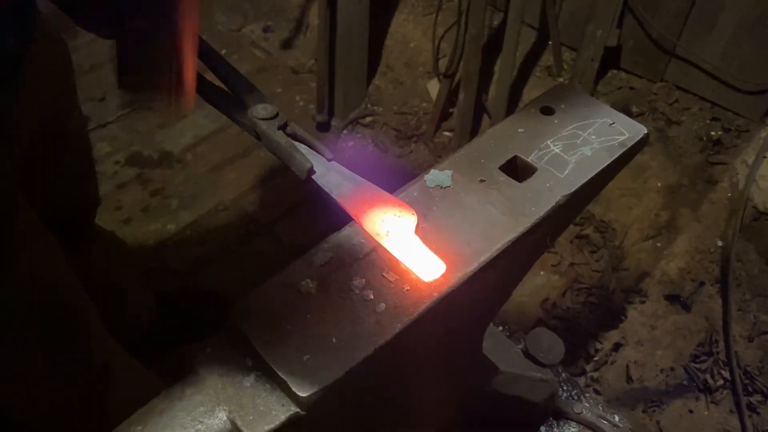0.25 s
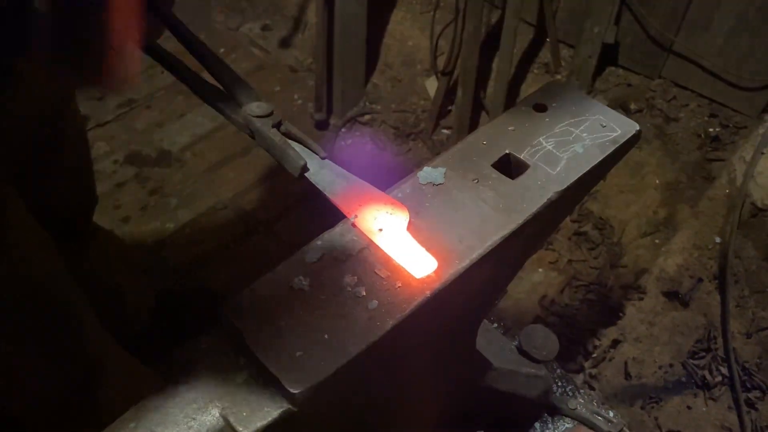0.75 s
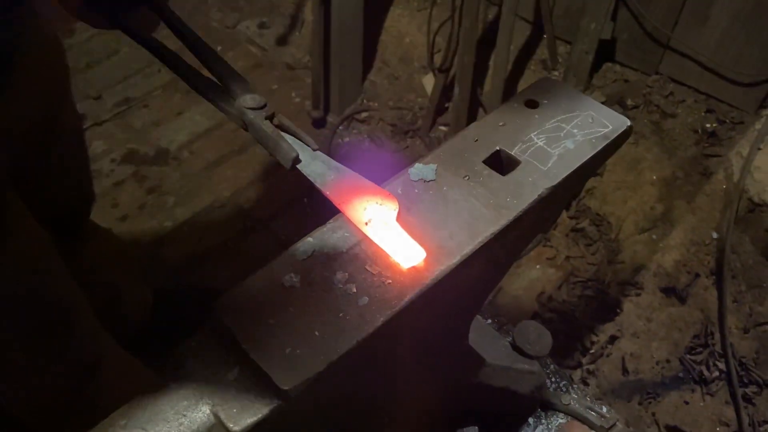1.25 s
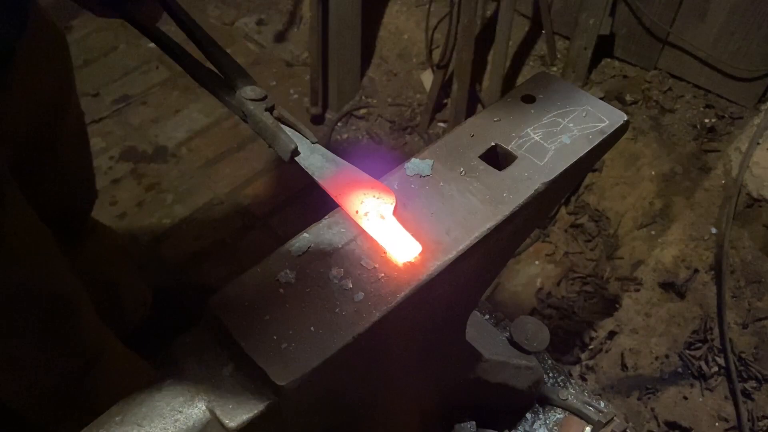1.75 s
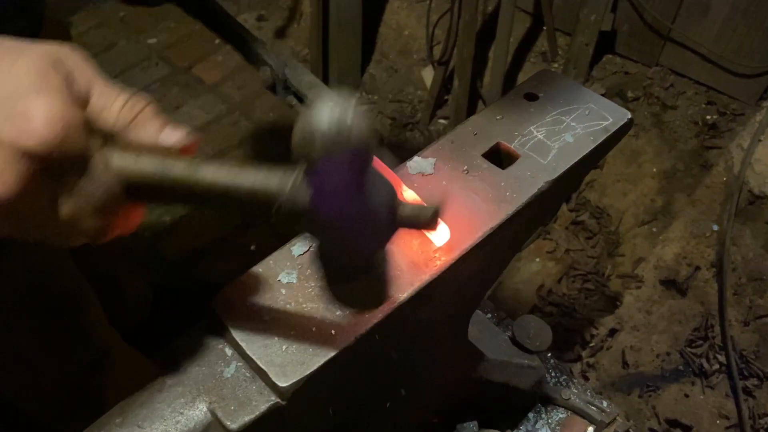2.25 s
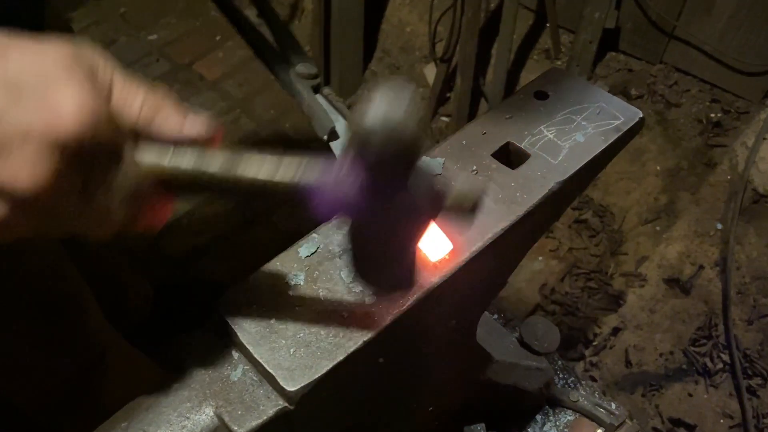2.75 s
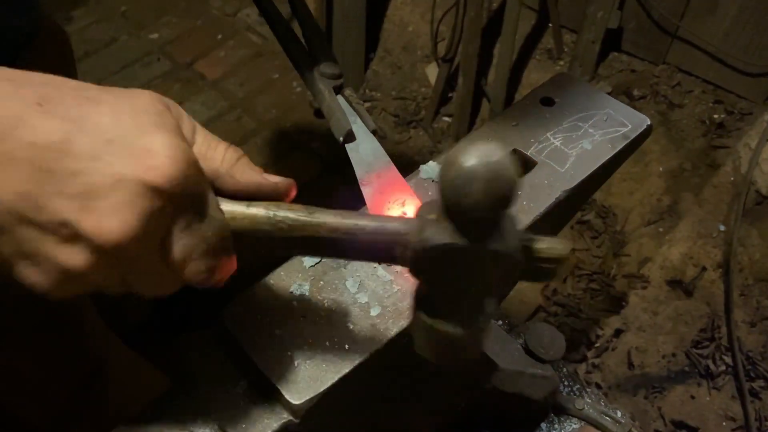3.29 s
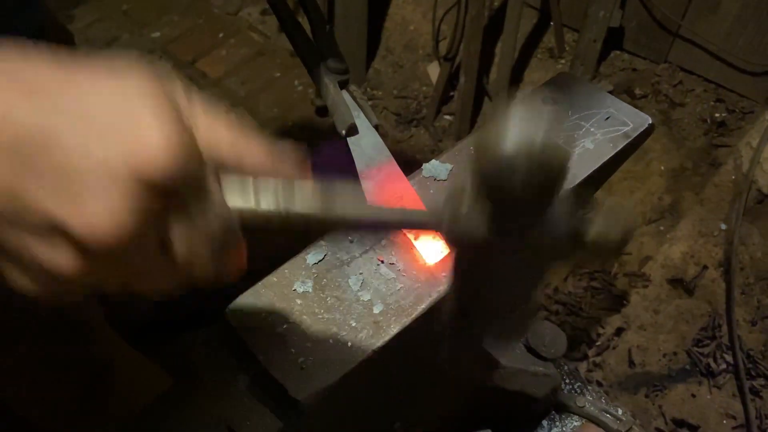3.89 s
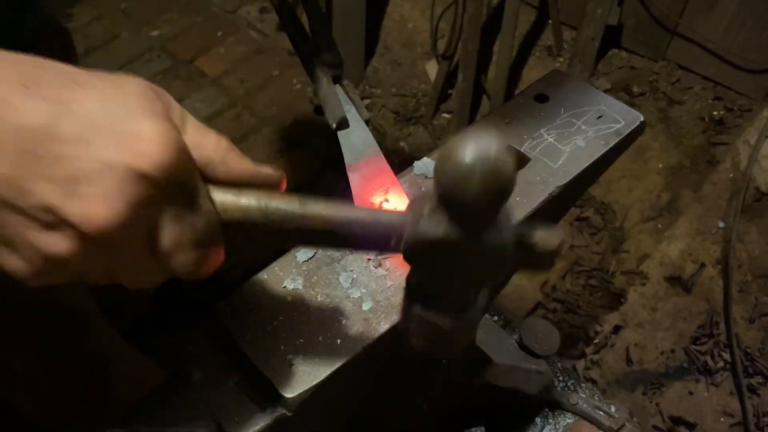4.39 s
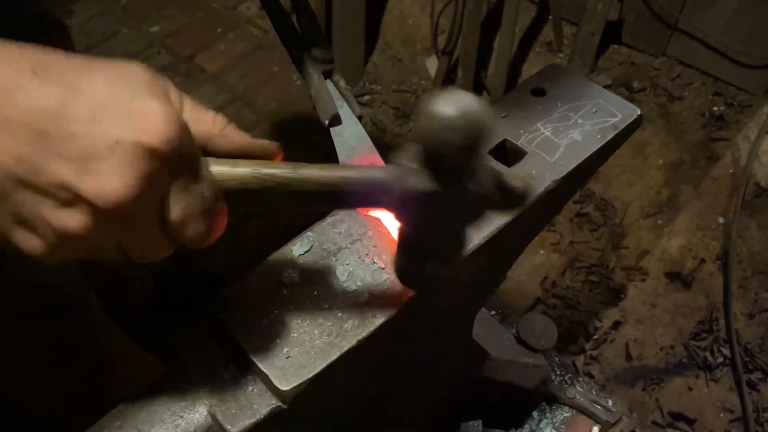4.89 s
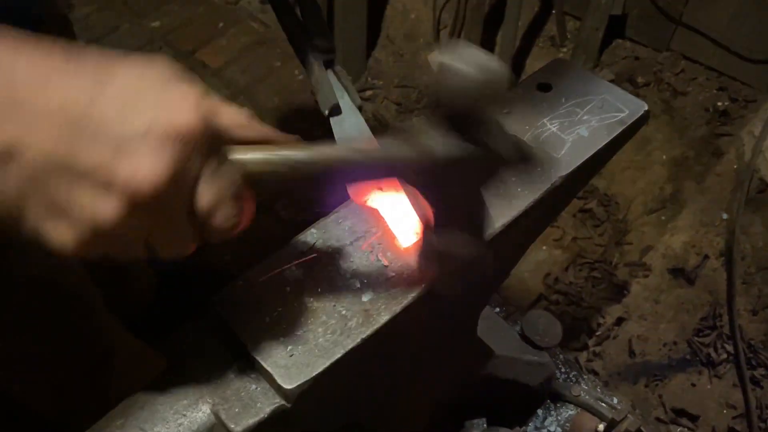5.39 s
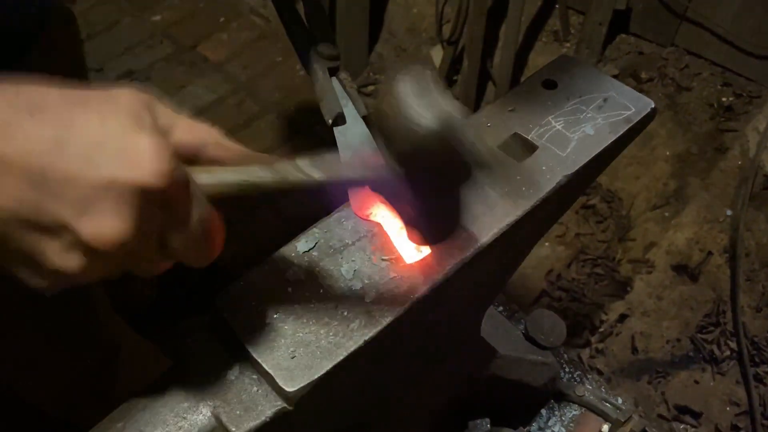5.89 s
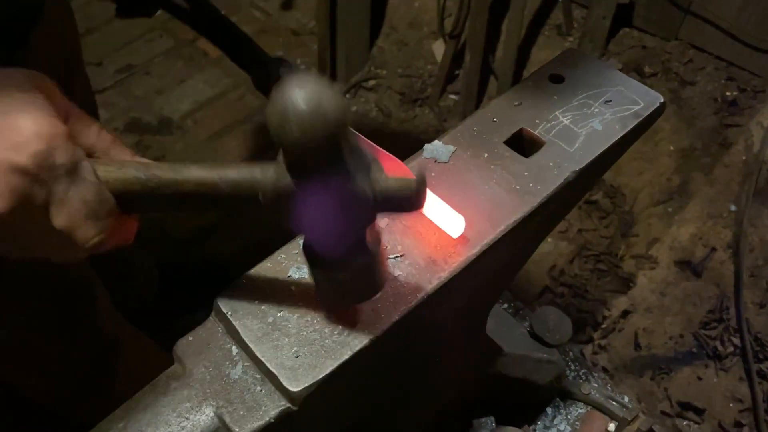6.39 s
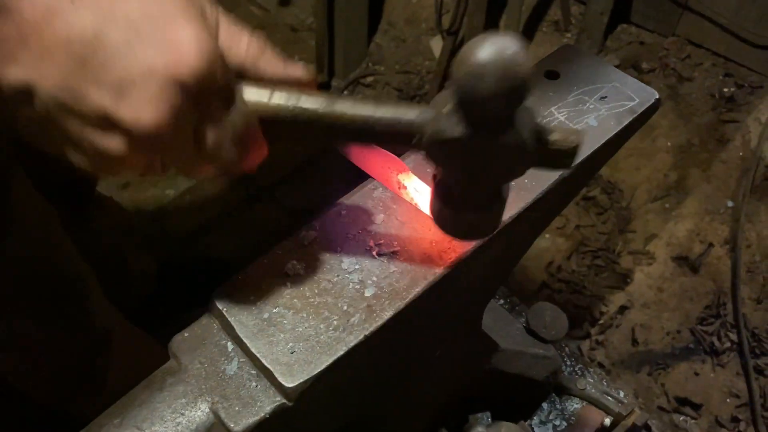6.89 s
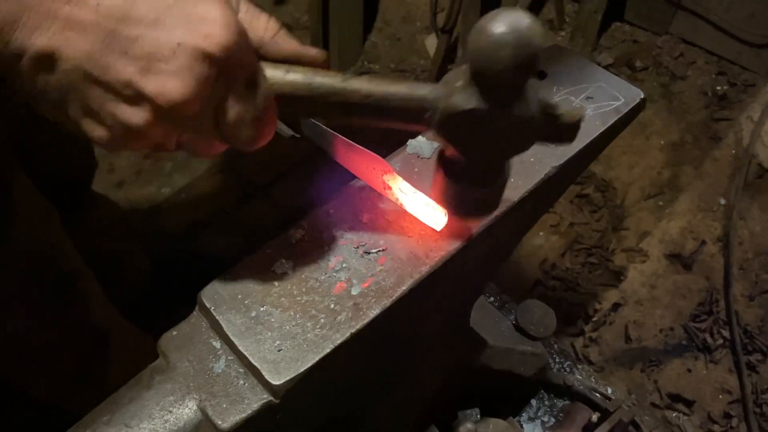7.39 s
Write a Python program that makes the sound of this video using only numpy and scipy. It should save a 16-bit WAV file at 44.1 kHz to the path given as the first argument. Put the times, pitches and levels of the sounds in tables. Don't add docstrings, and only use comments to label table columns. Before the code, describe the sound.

A hand hammer strikes glowing steel on an anvil about twice a second, bright clanks with short rings, while a cricket chirps softly behind.

```python
import sys
import numpy as np
from scipy import signal
from scipy.fft import rfft, irfft, next_fast_len
from scipy.io import wavfile

SR = 44100
rng = np.random.default_rng(int(sys.argv[2]) if len(sys.argv) > 2 else 0)


def invert_db(level):
    return 10 ** (np.asarray(level, dtype=float) / 20)


def dump(signal):
    limited = np.clip(np.atleast_2d(signal).T, -1, 1)
    pcm = np.round(limited * 32767).astype(np.int16)
    wavfile.write(sys.argv[1], SR, pcm)


N = 337365

# (time [s], stump thud [dB], anvil ring [dB], bar knock [dB], brightness [dB])
BLOWS = [(0.279, -26, -17, -21, -26), (0.807, -25.5, -17, -22.5, -25.5), (1.353, -36, -16, -22, -25),
         (1.886, -37.5, -16.5, -20.5, -26.5), (2.223, -60, -18, -24, -28.5), (2.334, -57, -19, -26.5, -32),
         (2.42, -57.5, -23.5, -32.5, -53), (3.064, -34, -21.5, -17.5, -28.5),
         (3.598, -37, -18.5, -22, -26.5), (4.145, -35, -16.5, -20, -26), (4.69, -35, -16, -21, -24.5),
         (5.216, -35.5, -15.5, -21, -27.5), (5.75, -39, -16.5, -20.5, -25.5),
         (6.179, -54, -19.5, -24.5, -33), (6.309, -54.5, -19.5, -29, -31), (6.618, -48.5, -47, -26, -42.5),
         (7.184, -33, -28, -14.5, -28.5)]
BLOW_S, THUD_DB, RING_DB, KNOCK_DB, BRIGHT_DB = np.transpose(BLOWS)
USUAL_THUD_DB, USUAL_RING_DB = -35, -17


def rms_one(x):
    return x / np.sqrt(np.mean(x ** 2) + 1e-20)


def at_hz(rows, hz):
    f, *columns = np.transpose(rows)
    return [np.interp(np.log(hz), np.log(f), c) for c in columns]


def band(x, low_hz, high_hz):
    return signal.sosfilt(signal.butter(2, [low_hz, high_hz], "band", fs=SR, output="sos"), x)


def clicks(times, sizes):
    out = np.full(N, 1e-18)
    out[np.round(np.asarray(times) * SR).astype(int)] = sizes
    return out


def fade(x, t60):
    return signal.lfilter([1], [1, -invert_db(-60 / (t60 * SR))], x)


def late_swell(x, t60):
    return fade(fade(x, t60), t60) * 20 / (t60 * SR)


def drift(rate):
    knots = rng.standard_normal(1000)
    return np.interp(np.arange(N) / SR * rate, np.arange(len(knots)), knots)


def stereo(pair, alike):
    alike = np.clip(alike, 0, 1)
    middle = np.sqrt(1 + alike) * pair[0]
    side = np.sqrt(1 - alike) * pair[1] * [[1], [-1]]
    return (middle + side) / np.sqrt(2)


def swell_db(row):
    s, rise, hold, fall, _ = row
    floor_db = -21
    corners = s + np.cumsum(np.abs([0, rise, hold, fall]))
    return np.interp(np.arange(N) / SR, corners, [floor_db, 0, 0, floor_db], left=-200, right=-200)


def level(rows):
    return sum(invert_db(row[-1] + swell_db(row)) for row in rows)


def dulling_db(hz):
    return 13 * (THUD_DB < -51.5) * (hz > 8600)


def chorus():
    # (centre [Hz], half width [Hz], level [dB], throb rate [per s])
    insects = [(2280, 90, -72, 82), (4520, 170, -73, 79), (4730, 60, -79.5, 45), (5003, 54, -92.5, 30),
               (6360, 50, -89.5, 35), (350, 27, -89, 3)]
    # (start [s], rise [s], hold [s], fall [s], level [dB])
    trills = [
        (.4, .08, .16, 0.14, -66),
        (.95, .08, .1, .12, -74),
        (2.0, .08, .1, 0.11, -83),
        (3.72, .06, .1, 0.13, -70),
        (4.45, .08, .1, .08, -80.5),
        (5.3, 0.062, .08, .08, -70),
        (6.6, .07, .15, .1, -72),
    ]
    out, t = np.zeros((2, N)), np.arange(N) / SR
    for hz, width_hz, db, per_s in insects:
        pair = rms_one(band(rng.standard_normal((2, N)), hz - width_hz, hz + width_hz))
        throb = 1 + .3 * np.sin(2 * np.pi * per_s * t + 2 * drift(8))
        out += invert_db(db + 1.2 * drift(2.7)) * throb * stereo(pair, 0.97)
    effort = sum(invert_db(swell_db(row)) for row in trills)
    trill_hz = 5000 + 70 * effort + 40 * drift(120)
    phase = 2 * np.pi * np.cumsum(trill_hz) / SR
    return out + level(trills) * invert_db(2.5 * drift(60)) * np.sin(phase + [[0], [.7]])


def yard():
    # (frequency [Hz], crack [dB], crack t60 [s], near scatter [dB], near t60 [s],
    # far tail [dB], far t60 [s])
    splash = [(60, -30, .06, -25.5, 0.12, -37.5, 0.85), (250, -15, 0.032, -21.5, 0.39, -46, 0.45),
              (625, -24.5, .03, -27, .12, -48.5, 0.36), (960, -8, 0.0084, -23.5, 0.091, -50, .4),
              (2200, -13, .02, -23.5, 0.17, -45, 0.52), (3250, -8.5, 0.034, -20.5, 0.14, -47, 0.29),
              (6400, -2, 0.028, -20, 0.16, -49.5, 0.49), (9700, 7, 0.017, -19.5, 0.16, -50.5, 0.37),
              (15600, -3.5, 0.0098, -19, .1, -50, 0.14)]
    # (frequency [Hz], density [dB per Hz])
    night = [(18, -30), (32, -14), (88, 3.5), (1670, -34), (2220, -7), (2750, -30), (3870, -24),
             (4530, -16), (6550, -31.5), (7270, -35), (16000, -49.5)]
    # (frequency [Hz], left-right likeness [0..1])
    likeness = [(60, 0.26), (300, 0.49), (1000, .6), (3000, 0.067), (8000, 0.7), (16000, .9)]
    night_db, earlier_db = -87.5, -32.5
    edges_hz = 28 * 2 ** np.arange(0, 9.4, 1 / 3)
    out = np.zeros((2, N))
    white = rng.standard_normal((2, 2, N))
    far_share_db = 3 + .4 * (RING_DB - KNOCK_DB - 10) + 0.11 * (THUD_DB - USUAL_THUD_DB)
    for k, (low, high) in enumerate(zip(edges_hz, edges_hz[1:])):
        hz = np.sqrt(low * high)
        pair = rms_one(band(white[k % 2], low, high))
        crack_db, crack_s, near_db, near_s, far_db, far_s = at_hz(splash, hz)
        drives = np.transpose([THUD_DB, KNOCK_DB, BRIGHT_DB])
        colour_db = np.array([np.interp(np.log(hz), np.log([200, 1000, 9000]), drive) for drive in drives])
        colour_db -= dulling_db(hz)
        crack = fade(clicks(BLOW_S + 0.21 / hz, invert_db(colour_db)), crack_s)
        echo = clicks(BLOW_S + 0.0026, invert_db(5.5 + 0.82 * colour_db + 0.22 * KNOCK_DB))
        near = fade(echo, near_s)
        echo[echo > 1e-9] *= invert_db(far_share_db)
        echo[0] = invert_db(earlier_db)
        far = late_swell(echo, far_s)
        tail = invert_db(near_db) * near + invert_db(far_db) * far
        air = invert_db(at_hz(night, hz)[0] + night_db) * np.sqrt((high - low) / 50)
        patchy = invert_db(2 * drift(25))
        scattered = (tail * patchy + air) * stereo(pair, at_hz(likeness, hz)[0])
        out += invert_db(crack_db) * crack * pair[0] + scattered
    return out


def late_rumble():
    kicks = clicks(BLOW_S + .08, invert_db(-59 + .7 * (THUD_DB - USUAL_THUD_DB)))
    kicks[0] = invert_db(-59)
    return late_swell(kicks, 0.17) + invert_db(-71 + 2.6 * drift(6))


def small_noises():
    # (time [s], peak [dB])
    flakes = [(0.135, -65), (0.3343, -34.5), (0.8764, -58), (1.1194, -58), (1.8158, -55), (2.156, -55),
              (3.6395, -35.5), (4.186, -28.5), (4.1987, -28.5), (4.2137, -30.5), (4.2433, -31.5),
              (4.7477, -31.5), (5.6256, -57), (7.1902, -8.5)]
    # (start [s], rise [s], hold [s], fall [s], level [dB])
    hisses = [
        (5.36, .15, .02, 0.091, -68.5),
    ]
    # (start [s], rise [s], hold [s], fall [s], level [dB])
    slides = [
        (6.67, .04, .03, .05, -54),
    ]
    s, db = np.transpose(flakes)
    white = rng.standard_normal((4, N))
    ticks = fade(clicks(s, invert_db(db - 8.5)), 0.02) * rms_one(band(white[0], 2500, 14000))
    sizzle = level(hisses) * rms_one(band(white[1], 7400, 15500) + 0.66 * band(white[1], 3000, 10800))
    drag = level(slides) * invert_db(2.06 * drift(120)) * rms_one(band(white[2], 450, 1050))
    shudder = late_rumble() * rms_one(band(white[3], 42, 62) + .15 * band(white[3], 70, 200))
    return ticks + invert_db(5.5) * sizzle + invert_db(-4.0) * drag + shudder


def cricket(pulse_s=0.018, length_s=.016, from_hz=3580, to_hz=3020):
    chirps = [3, .157, .43, .699, .986, 1.269, 1.533, 1.803, 2.07, 2.35, 2.622, 2.894, 3.175, 3.465, 3.755,
              4.023, 4.291, 4.577, 4.848, 5.118, 5.38, 5.647, 5.916, 6.201, 6.468, 6.756, 7.019, 7.305,
              7.596, 7.87]
    pause_s = .125
    t = np.arange(int(length_s * SR)) / SR
    swell = np.sin(np.pi * (t / length_s) ** 1.1) ** 1.2
    s, dry = np.array(chirps[:-1]), np.zeros(N)
    count = np.round((np.diff(chirps) - pause_s) / pulse_s)
    luck = rng.standard_normal((len(s), 11))
    chirp_db = -63 - 0.84 * s + 2 * luck[:, -1]
    for k in range(10):
        stroke_hz = from_hz + k * 10 + (to_hz - from_hz) * t / length_s
        phase = 2 * np.pi * np.cumsum(stroke_hz) / SR
        stroke = swell * (np.sin(phase) + invert_db(-18.5) * np.sin(2 * phase))
        times = s + pulse_s * k
        heard = (k < count) & (times >= 0) & (times * SR < N - 1)
        sizes = invert_db(chirp_db + k * .5 + 2.0 * luck[:, k])
        dry += signal.fftconvolve(clicks(times[heard], sizes[heard]), stroke)[:N]
    lag = np.arange(int(.15 * SR)) / SR
    echoes = rng.standard_normal((2, len(lag))) * invert_db(-60 * lag / 0.16) * (lag > .004)
    return dry + invert_db(-28.5) * signal.fftconvolve(dry[None], echoes)[:, :N]


def faint_lead_in():
    lead_in_s, t60_s = .015, .07
    db = -36.5 + .6 * (THUD_DB - USUAL_THUD_DB) + .3 * (RING_DB - USUAL_RING_DB)
    ramp = invert_db(-60 * np.arange(lead_in_s * SR, 0, -1) / SR / t60_s)
    ahead = abs(signal.fftconvolve(clicks(BLOW_S - lead_in_s, invert_db(db + 1.0)), ramp)[:N])
    white = rng.standard_normal(N)
    return ahead * rms_one(band(white, 500, 5200) + 2.6 * band(white, 2000, 2500))


def struck(modes, drive_db, delay_s, spread_db):
    out = np.zeros(N)
    chance = rng.standard_normal((len(BLOWS), len(modes)))
    for (hz, mode_db, t60), luck in zip(modes, chance.T):
        hit_db = drive_db + mode_db - .6 * dulling_db(hz) + spread_db * luck
        hits = clicks(BLOW_S + delay_s, invert_db(hit_db))
        r, w = invert_db(-60 / (t60 * SR)), 2 * np.pi * hz / SR
        out += signal.lfilter([0, np.sin(w)], [1, -2 * r * np.cos(w), r * r], hits)
    return out


def sweep(drive_db, low_hz, high_hz, spread_s=1.51, lead_s=.001, t60=.066, delay_s=0, rise_s=1e-5):
    t = np.arange(int(.08 * SR)) / SR
    wave = np.sin(2 * np.pi * spread_s * np.log(1 + t / lead_s))
    wave = wave * invert_db(-60 * t / t60) * (1 - np.exp(-(t / rise_s) ** 2))
    wave = band(wave, low_hz, high_hz)
    return signal.fftconvolve(clicks(BLOW_S + delay_s, invert_db(drive_db)), wave / abs(wave).max())[:N]


def place():
    latest = np.maximum(np.searchsorted(BLOW_S, np.arange(N) / SR) - 1, 0)
    return invert_db(3 / 2 * (THUD_DB[latest] < -48) * [[1], [-1]])


def anvil():
    # (frequency [Hz], level [dB], t60 [s])
    thud_modes = [(63, 5, 0.091), (127, 12.5, 0.064), (208, 15, 0.15), (304, 15.5, 0.056), (348, 15, .05)]
    # (frequency [Hz], level [dB], t60 [s])
    knock_modes = [(785, 5, .035), (881, -12, 0.1), (1250, -1, .025), (1340, 3.5, 0.017), (1590, 4, 0.04),
                   (1790, 0, 0.035), (1946, -2, .035)]
    # (frequency [Hz], level [dB], t60 [s])
    ring_modes = [(2248.7, 2.5, 0.052), (2350, -9.5, .03), (2236, -27.5, 0.34), (2300, -25, 0.3),
                  (2335, -9, 0.0089), (2280, -9, .014)]
    # (frequency [Hz], level [dB], t60 [s])
    sheen_modes = [(4490, -1, .06), (4725, 1, .045), (7910, -1, .12), (8300, 1, .06), (11960, -1, .05),
                   (15690, 6, .06)]
    ring = struck(ring_modes, RING_DB, delay_s=.0005, spread_db=1.5)
    sheen = struck(sheen_modes, BRIGHT_DB, delay_s=0.00035, spread_db=4)
    knock = struck(knock_modes, KNOCK_DB, delay_s=0.00034, spread_db=4)
    bend = sweep(KNOCK_DB, 1000, 1500)
    steel = invert_db(6) * ring + sheen + invert_db(-6.5) * knock + invert_db(9.0) * bend
    lag = np.arange(int(.25 * SR)) / SR
    echoes = rng.standard_normal(len(lag)) * invert_db(-60 * lag / 0.15) * (lag > .003)
    echoes = band(echoes, 200, 8400)
    rough_steel = steel + invert_db(-38.5) * signal.fftconvolve(steel, echoes)[:N]
    push = sweep(THUD_DB, 50, 300, spread_s=1.05, lead_s=.001, t60=.033, delay_s=.0003, rise_s=.0024)
    stump = struck(thud_modes, THUD_DB, delay_s=.004, spread_db=1.5)
    return place() * rough_steel + invert_db(15.5) * push + invert_db(-18.5) * stump


def scene():
    return chorus() + yard() + small_noises() + cricket() + faint_lead_in() + anvil()


def low_pass(x):
    return signal.sosfilt(signal.butter(12, 16960, fs=SR, output="sos"), x)


def record(dry):
    # (frequency [Hz], left lead [rad])
    port_phase = [(0, 0), (950, -0.0), (1720, 1.8), (2240, -0.0), (4650, 0.4), (7410, -0.3), (8700, -2.9),
                  (9560, -3.6), (10400, -5.7), (11600, -6.7), (12600, -8.8), (13700, -9.7), (14700, -12.3),
                  (16500, -12.7)]
    # (frequency [Hz], left minus right [dB])
    port_balance = [(60, 1.5), (110, 1.5), (200, 2), (380, 2.5), (700, 5), (1290, 0), (2380, 1.8),
                    (4400, 3.5), (8120, 0.5), (15000, -1)]
    size = next_fast_len(N + 4096)
    hz = np.arange(size // 2 + 1) * SR / size
    turn = np.interp(hz, *np.transpose(port_phase)) / 2
    port = invert_db(at_hz(port_balance, hz + 1)[0] / 2) * np.exp(1j * turn)
    wet = irfft(rfft(dry, size) * [port, 1 / port], size)[:, :N]
    wet = 1.03 * np.tanh(wet / 1.172)
    wet = signal.sosfilt(signal.cheby2(10, 60, 17000, fs=SR, output="sos"), wet)
    wet = signal.sosfilt(signal.butter(3, 40, "high", fs=SR, output="sos"), wet)
    return low_pass(wet)


dry = scene()
out = record(dry)
dump(out)
```